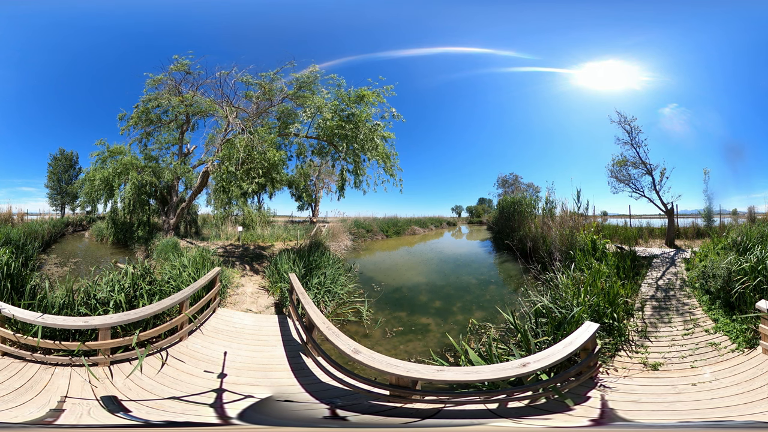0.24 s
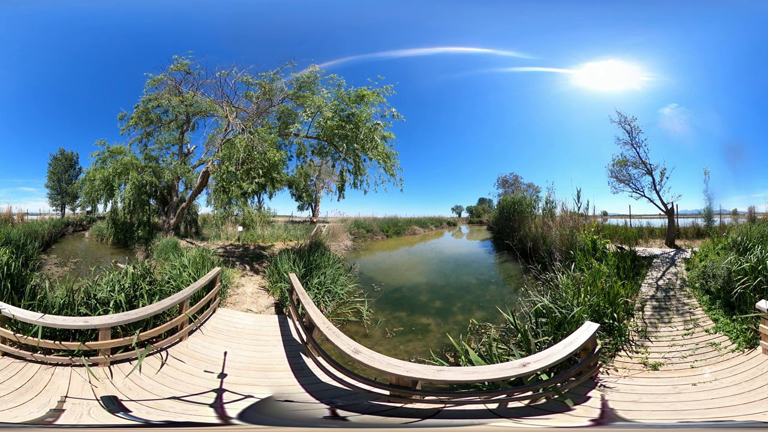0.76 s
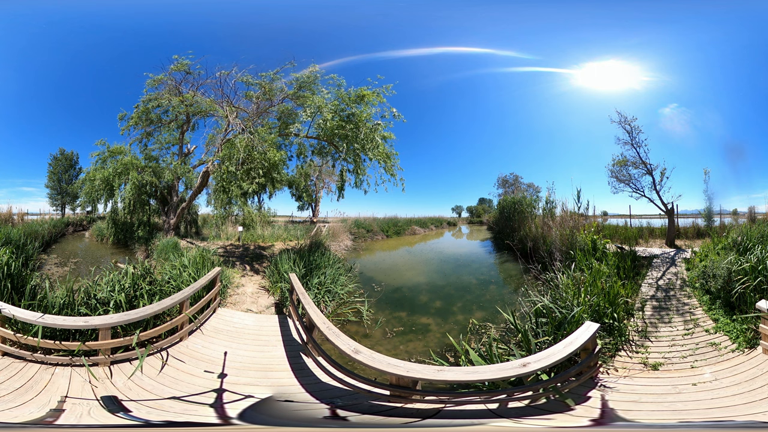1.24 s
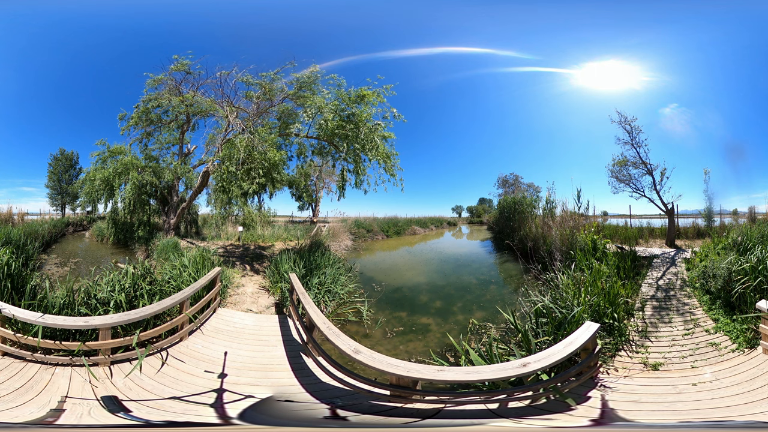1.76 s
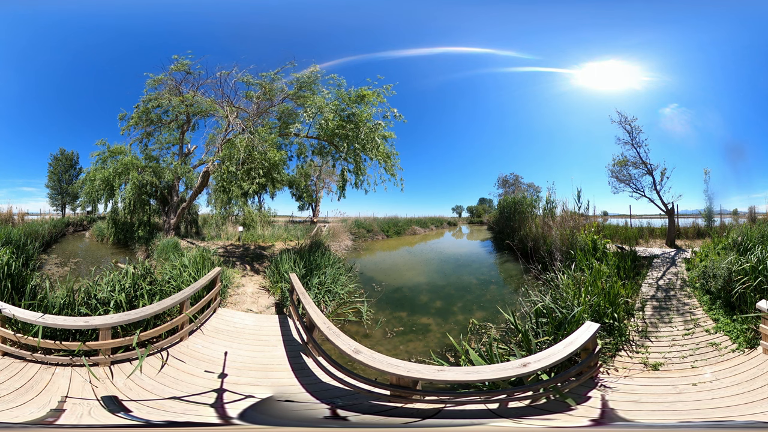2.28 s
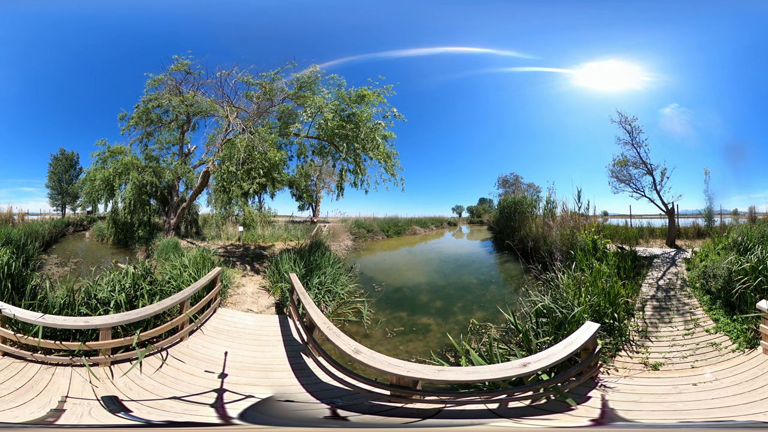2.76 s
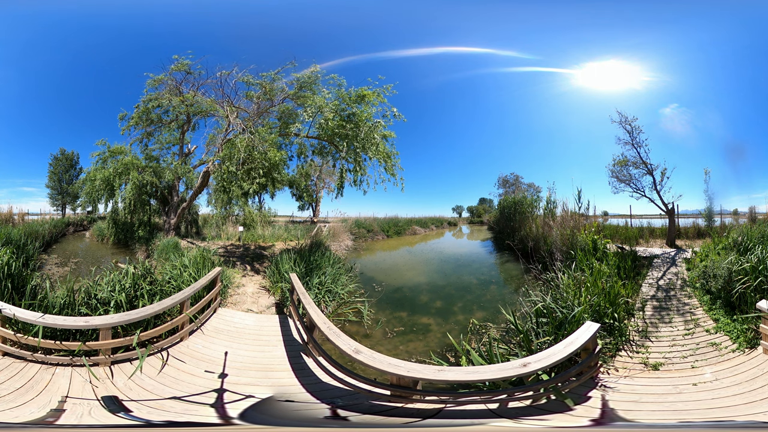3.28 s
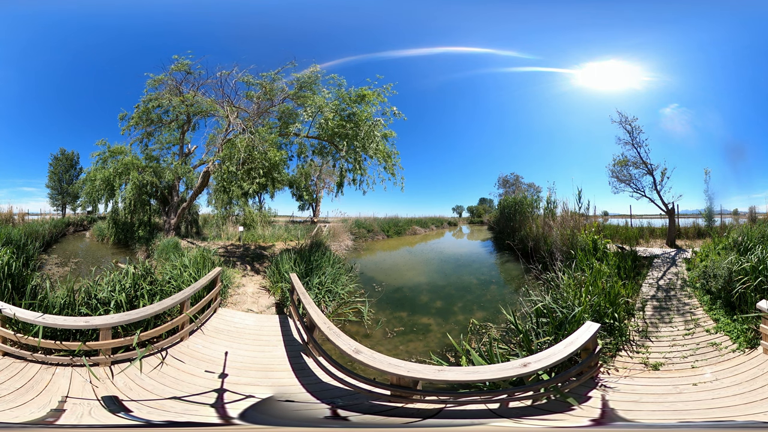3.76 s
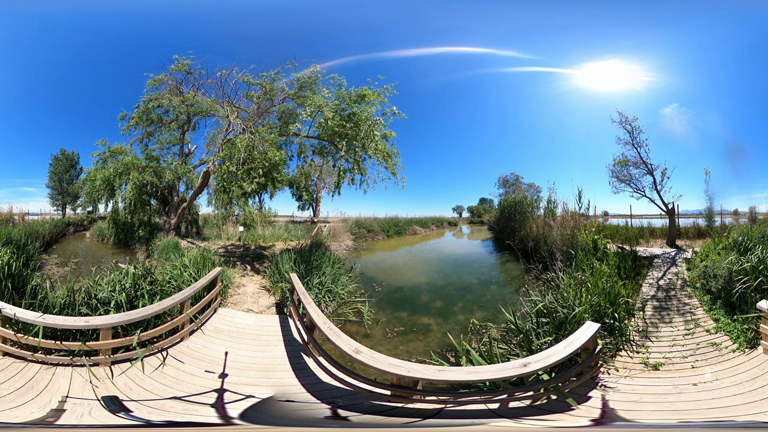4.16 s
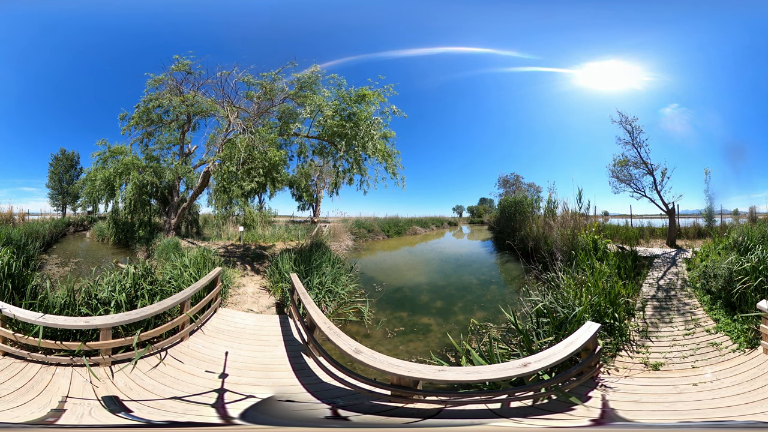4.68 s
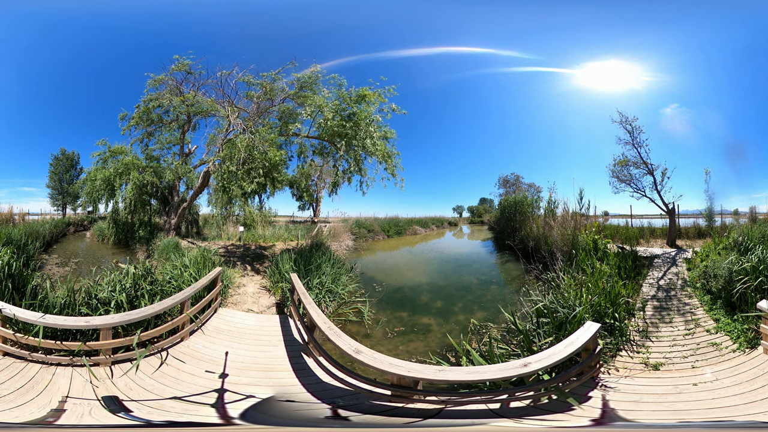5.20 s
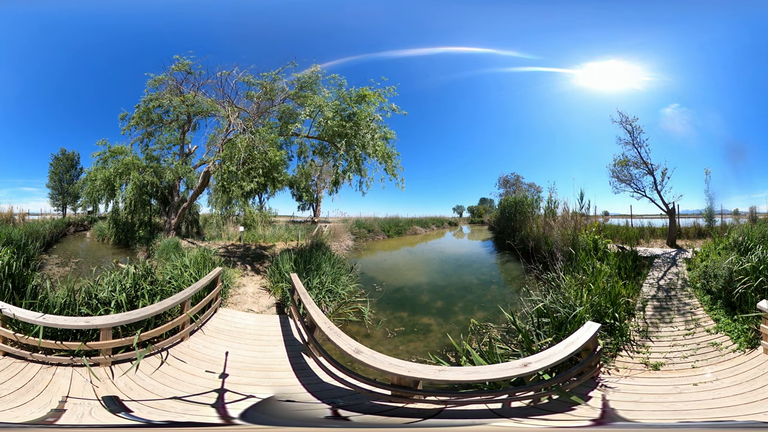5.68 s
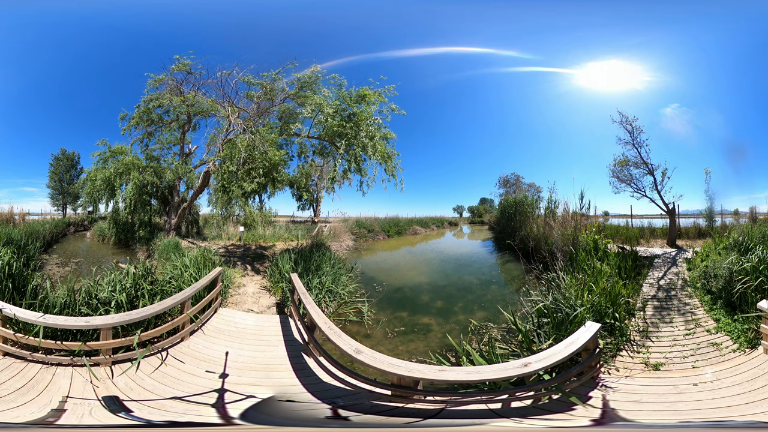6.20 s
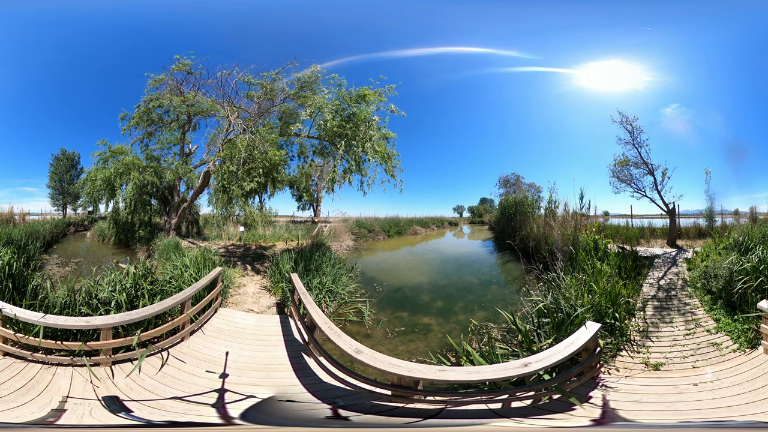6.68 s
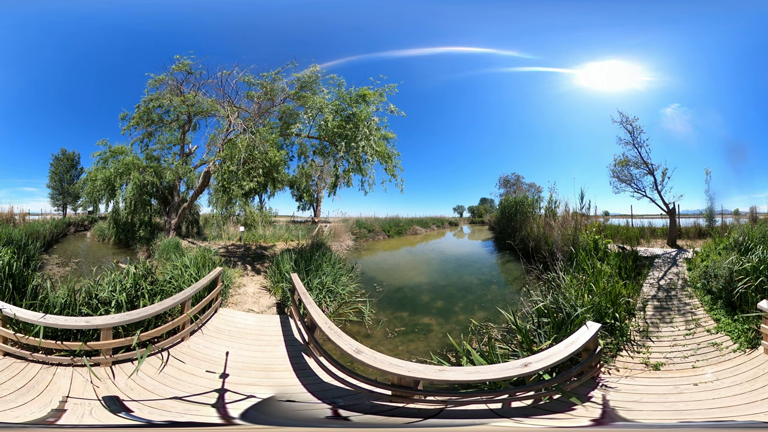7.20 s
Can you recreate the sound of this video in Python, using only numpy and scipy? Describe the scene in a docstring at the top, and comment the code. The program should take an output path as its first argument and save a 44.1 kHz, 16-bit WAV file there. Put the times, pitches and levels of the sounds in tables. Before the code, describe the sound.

Sharp high bird calls and a brief insect-like bird trill above faint open-air murmur, later joined by low wind buffeting the microphone.

```python
"""Small birds call around a reedy lagoon: two trade thin falling whistles, others chip and chirp, one gives a dry buzzing trill.
Reed stems scatter every call and a line of trees sends back a faint echo.
Distant air murmurs under them, and after three seconds gusts begin to rumble on the microphone."""
import sys
import numpy as np
from scipy import signal
from scipy.fft import rfft, irfft, next_fast_len
from scipy.io import wavfile
from scipy.ndimage import uniform_filter1d, map_coordinates

SR = 44100
rng = np.random.default_rng(int(sys.argv[2]) if len(sys.argv) > 2 else 0)


def inscribe(sig):
    """Save sig as 16-bit PCM at rate SR to the path in sys.argv[1].

    A 1-D sig is mono; a 2-D sig holds one channel per row.
    Samples are clipped to [-1, 1] before scaling.
    """
    pcm = np.round(np.clip(np.atleast_2d(sig).T, -1, 1) * 32767)
    wavfile.write(sys.argv[1], SR, pcm.astype(np.int16))


N = 328545

# Note shapes: (s from the start of the note, pitch Hz, level dB)
SHAPES = {
    "tsee": [(0, 8258, -12), (.002, 7357, -0.5), (.005, 4376, -19), (.0062, 7607, -6.5), (.009, 4868, -14), (.0102, 7570, -3), (.014, 7583, 0.5), (.036, 7492, -6.5), (.044, 7520, -7), (.056, 7244, 0), (.068, 6435, -2), (.079, 5603, -4), (.086, 5147, -35)],
    "ti-tsee": [(0, 6096, -22.5), (.004, 7667, -6.5), (.009, 6975, -1.5), (.014, 5207, -15.5), (.022, 4375, -28.5), (.026, 5710, -38.5), (.029, 7290, 3.5), (.043, 7825, -7), (.056, 7680, -4), (.068, 7210, 1), (.085, 5897, -1), (.092, 6010, -9)],
    "zip": [(0, 10700, -28), (.009, 9700, -25), (.013, 8300, -13.5), (.0145, 7200, 1.5), (.017, 5700, -7.5), (.021, 4400, -16), (.03, 3650, -23), (.042, 3300, -35)],
    "chip": [(0, 4535, -27.5), (.01, 5554, -8.5), (.022, 6350, -2), (.034, 6300, -6), (.043, 5825, -4.5)],
    "lisp": [(0, 5290, -12.5), (.012, 5600, 1), (.028, 6000, -1.5), (.042, 6087, -5.5)],
    "wit": [(0, 3450, -26.5), (.013, 3920, -21.5), (.018, 4880, -9.5), (.023, 5320, 0.5), (.029, 5550, -2.5), (.034, 5230, -9.5)],
    "tew": [(0, 5600, -11.5), (.025, 5300, -2.5), (.05, 4900, -7), (.065, 4400, -14)],
    "churr": [(0, 5660, -15.5), (.018, 4510, -0.5), (.034, 3707, -8), (.043, 3204, -3), (.048, 4160, -1), (.054, 3050, 10.5), (.062, 3880, -18.5), (.075, 3080, -11)],
    "chuck": [(0, 4500, -9), (.025, 3150, -6), (.033, 3548, 1), (.04, 2780, 1.5), (.052, 2850, -11)],
    "warble": [(0, 4784, -14), (.015, 5400, -2.5), (.027, 4120, -4.5), (.036, 4900, -10), (.047, 3724, -0.5), (.054, 4353, 0.5), (.064, 3400, -4), (.076, 4100, -8), (.09, 3288, 1)],
    "whoop": [(0, 1293, -5.5), (.06, 1453, -0.5), (.13, 1675, -1), (.2, 1650, -3), (.25, 1545, -13.5)],
}
# Calls: (s, shape, level dB, length factor, reed scatter dB)
CALLS = [
    (.351, "tew", -53, .33, -6.5),
    (.357, "zip", -33, 1.002, -6),
    (.487, "tsee", -38.5, 0.99, -5.5),
    (.745, "tsee", -70.5, 0.93, 3.5),
    (.83, "whoop", -74.5, .91, 7.5),
    (.968, "warble", -63.5, .93, -5),
    (1.339, "tsee", -41.8, 1.008, -4),
    (1.534, "tsee", -68.5, 0.985, 3),
    (1.874, "chip", -49.5, 0.75, -4),
    (1.933, "chip", -46.5, 1.03, -7),
    (2.260, "tsee", -46, 1.06, -0.5),
    (2.802, "chuck", -54.5, 1, -3),
    (3.032, "tsee", -49.5, 0.94, -4),
    (3.074, "tsee", -57, .96, -3),
    (3.892, "tsee", -49.5, 1.006, -2.5),
    (4.128, "warble", -71.5, 1.186, -0.5),
    (4.4, "chip", -54.5, 1.25, -2),
    (4.474, "lisp", -56, 0.87, -8),
    (4.611, "ti-tsee", -63, 0.97, -18.5),
    (4.727, "tsee", -52, 1, -0.5),
    (5.372, "warble", -68, 1.03, -2),
    (5.388, "ti-tsee", -57.5, 1.02, -7.5),
    (5.541, "tsee", -51.5, 0.956, -2),
    (5.895, "chuck", -73.5, 0.91, -1),
    (6.204, "ti-tsee", -54, 0.963, -6.5),
    (6.342, "tsee", -51.5, 0.88, -2.5),
    (6.675, "churr", -57.5, 0.988, 0.5),
    (6.974, "ti-tsee", -50.5, 1.002, -9.5),
    (7.051, "warble", -74.5, 1.39, -2),
    (7.168, "tsee", -68, 1.22, 7),
    (7.376, "wit", -45.5, 0.902, -10),
]
TRILL_NOTE = [(0, 5457, -36.5), (.0015, 4736, 7), (.0035, 4076, 0), (.006, 3697, 0.5), (.0078, 3430, 4.5), (.0095, 3281, -20)]  # (s, Hz, dB)
TRILL_THROAT = [(2800, -38), (3300, -14), (3430, -2), (4620, -0.5), (4760, -8.5), (5100, -5), (5600, -27.5)]  # (Hz, dB)
BUFFET = [(8, -12.5), (24, 3.5), (40, -3), (58, -7), (80, -21), (130, -40), (400, -120)]  # (Hz, dB per Hz)
GUST = [(30, -33), (60, 1), (82, 0), (115, -5.5), (160, -11), (220, -24), (350, -58), (900, -120)]  # (Hz, dB per Hz)
MURMUR = [(70, -16), (130, -4.5), (190, 4), (260, -3), (420, -7.5), (550, -8.5), (720, -12.5), (930, -16.5), (1030, -11), (1500, -13), (2200, -17.5), (3500, -22.5), (8000, -44.5), (14000, -51)]  # (Hz, dB per Hz)
CHORUS = [(4000, -12), (5200, -4), (5650, -3), (5850, 2), (6150, -5), (7600, -3.5), (8100, -11.5), (9000, -17), (12000, -32), (14000, -48.5)]  # far birds and reeds: (Hz, dB per Hz)
TOP_HZ = 13300  # fixed
RUSTLES = [(0.884, -66, 0.02), (2.791, -64, 0.0134), (3.938, -68, 0.118), (6.366, -64, 0.0049), (6.795, -72, .02)]  # reeds brushing: (s, level dB, half length s)
LEAVES = [(2000, -3.5), (4000, -10), (6300, 4), (7800, -5.5), (9000, -13.5), (12500, -23), (14000, -44)]  # (Hz, dB per Hz)
TRILL_RASP = [(3300, -33.5), (4700, 1.5), (5300, -8), (6000, -10), (8000, -23.5), (11000, -38.5), (13000, -51)]  # (Hz, dB per Hz)
FLUTTER = [(60, -40), (115, 2), (160, 0), (200, -15), (250, -30), (310, -42.5), (500, -60.5), (1200, -120)]  # (Hz, dB per Hz)
# The breeze freshens after three seconds: (s, level of its slow push on the microphone dB)
BREEZE = [(0, -58.5), (1.4, -55.5), (2.8, -53), (3.3, -44), (6.8, -46), (7.45, -49.5)]
# Gusts that hit the microphone: (s at the peak, slow push dB, rumble dB, length s)
GUSTS = [
    (2.935, -41, -63, 0.037),
    (3.153, -37, -58, 0.054),
    (3.311, -31, -50.5, 0.0967),
    (3.71, -41.5, -49.5, 0.043),
    (3.88, -39.5, -58, 0.026),
    (3.982, -34.5, -55.5, 0.022),
    (4.119, -47, -63.5, 0.04),
    (4.359, -37.5, -37, 0.046),
    (4.462, -24.5, -38, 0.0465),
    (4.531, -30.5, -36.5, 0.0846),
    (4.69, -32.5, -48.5, 0.0423),
    (4.972, -32.5, -74.5, 0.116),
    (5.314, -35.5, -71, 0.134),
    (5.439, -31.5, -49.5, 0.0227),
    (5.627, -34, -51.5, 0.073),
    (5.722, -36, -41, 0.0355),
    (5.823, -34, -53.5, 0.093),
    (6.085, -33, -43, 0.085),
    (6.329, -45.5, -51.5, 0.042),
    (6.654, -40.5, -47.5, .075),
    (6.87, -38.5, -60, 0.42),
    (7.02, -36, -53.5, 0.0556),
]
GUST_RISE, GUST_FALL = 0.613, 0.662  # shares of a gust's length
LIGHT_RUMBLE_DB, RUMBLE_GROWS = -71.5, 0.685  # rumble of the lightest breeze; dB more per dB of breeze
MURMUR_LEVEL = [(0, -64.5), (1.1, -63.5), (2.7, -64.5), (3.6, -66), (7.45, -66)]  # (s, level dB)
HAZE_DB, HAZE_DB_PER_S = -74.5, 0.3851  # the high haze slowly grows
TRILL_START_S, TRILL_PEAK_S, TRILL_END_S, TRILL_DB = 2.2, 2.771, 3.374, -52  # the trill swells, peaks and fades
TRILL_SWELL, TRILL_FADE = 1.002, 1.49  # steepness of the rise and of the fall
TRILL_FAST_HZ, TRILL_SLOW_HZ = 226.7, 167.14  # notes a second, early and late
TRILL_SLOWS_AT_S, TRILL_SLOWS_OVER_S = 2.65, .17
# Each kind of note: (pitch flutter share, t60 of the reeds around its perch s)
VOICES = {"tsee": (.0045, 0.255), "ti-tsee": (.0045, 0.19), "zip": (.003, 0.205), "chip": (.018, .23), "lisp": (0.025, .2),
          "wit": (.004, 0.12), "tew": (.01, .2), "churr": (0.0843, 0.152), "chuck": (0.0347, .16), "warble": (.03, .16), "whoop": (0.039, .23)}


def amp(db):
    """Decibels to gain."""
    return 10 ** (np.asarray(db) / 20)


def unit(x):
    """x at rms 1."""
    return x / np.sqrt(np.mean(x ** 2) + 1e-20)


def curves(rows, size=N):
    """One value per sample for each column after the time."""
    s, *cols = np.transpose(rows)
    return [np.interp(np.arange(size) / SR, s, c) for c in cols]


def wobble(rate, size=N):
    """A smooth random curve, rate knots a second."""
    return map_coordinates(rng.standard_normal(int(size * rate / SR) + 4), [np.arange(size) * rate / SR])


def filtered(x, response):
    """x times a response of frequency."""
    m = next_fast_len(N + SR // 2)
    return irfft(rfft(x, m) * response(np.fft.rfftfreq(m, 1 / SR)), m)[:N]


def coloured(x, points):
    """x through a spectrum of (Hz, dB) points, at rms 1."""
    f, db = np.transpose(points)
    return unit(filtered(x, lambda hz: amp(np.interp(np.log(hz + 1), np.log(f), db))))


def noise(points):
    """Noise of rms 1 with the given spectrum."""
    return coloured(rng.standard_normal(N), points)


def add(track, s, sound):
    """Mix a sound into the track at time s."""
    part = track[max(round(s * SR), 0):][:len(sound)]
    part += sound[:len(part)]


def whistle(shape, length=1, flutter=0, shimmer_db=2.5):
    """One note of the syrinx: a gliding sine, slightly unsteady in pitch and strength."""
    rows = np.array(shape) * [length, 1, 1]
    size = int(rows[-1, 0] * SR)
    hz, db = curves(rows, size=size)
    hz = hz * (1 + flutter * wobble(450, size=SR // 2)[:size])
    db = db + shimmer_db * wobble(127.9, size=SR // 2)[:size]
    return amp(db) * signal.windows.tukey(size, .06) * np.sin(2 * np.pi * np.cumsum(hz) / SR)


def reeds(x, scatter_db, near_t60=0.23, far_longer=3.92, far_db=-17):
    """The direct sound, a quick scatter from nearby stems and a long faint one from across the water."""
    t = np.arange(int(.6 * SR)) / SR  # fixed
    fade = (amp(-60 * t / near_t60) + amp(far_db - 60 * t / (far_longer * near_t60))) * (1 - np.exp(-t / 0.0016))
    tail = fade * rng.standard_normal(len(t))
    paths = amp(scatter_db) * tail / np.linalg.norm(tail)
    paths[0] = 1
    return signal.fftconvolve(x, paths)


def callers(echo_s=.125, echo_db=-25):
    """Each call comes from its own perch; the trees return it faintly."""
    track = np.zeros(N)
    for s, shape, db, length, scatter_db in CALLS:
        flutter, t60 = VOICES[shape]
        note = whistle(SHAPES[shape], length, flutter)
        call = amp(db) * reeds(note, scatter_db, near_t60=t60)
        add(track, s, call)
        add(track, s + echo_s, amp(echo_db) * call)
    return track


def trill(size_db=0.5, jitter_s=.00006, scatter_db=-4, rasp_db=-15, brighten=0.3):
    """A buzz of tiny falling notes that swells, slows down and fades; effort brightens it and adds a rasp."""
    t = np.arange(N) / SR
    rate = np.interp(np.tanh((t - TRILL_SLOWS_AT_S) / TRILL_SLOWS_OVER_S), [-1, 1], [TRILL_FAST_HZ, TRILL_SLOW_HZ])
    effort = arch(t, TRILL_START_S, TRILL_PEAK_S, TRILL_END_S, TRILL_SWELL, TRILL_FADE)
    times = np.flatnonzero(np.diff(np.floor(np.cumsum(rate) / SR))) / SR
    times = times[(times > TRILL_START_S) & (times < TRILL_END_S)]
    note, track = whistle(TRILL_NOTE, shimmer_db=0.0), np.zeros(N)
    for s, (strength, late) in zip(times, rng.standard_normal((len(times), 2))):
        opening = effort[int(s * SR)] ** (brighten * np.linspace(1, 0, len(note)))  # weak notes lose their high start
        add(track, s + jitter_s * late, amp(size_db * strength) * opening * note)
    sounding = (times[-1] - times[0]) * SR / N
    buzz = coloured(reeds(track, scatter_db)[:N], TRILL_THROAT) * np.sqrt(sounding)
    rasp = amp(rasp_db) * effort * noise(TRILL_RASP)
    return amp(TRILL_DB) * effort * (buzz + rasp)


def eddies(points, hold_s=0.099):
    """Low turbulence whose strength stays even from one eddy to the next."""
    x = noise(points)
    power = np.abs(uniform_filter1d(x ** 2, max(int(hold_s * SR), 1)))
    return unit(x / np.sqrt(power + 0.034))


def wind(push_wander_db=2.5, rumble_wander_db=2.0, flutter_db=-7.0, growth=0.4):
    """A restless breeze and its gusts push on the microphone; the stronger a gust, the more small, fast eddies it sheds."""
    breeze_db, = curves(BREEZE)
    _, pushes_db, rumbles_db, _ = np.transpose(GUSTS)
    light_db = LIGHT_RUMBLE_DB + RUMBLE_GROWS * (breeze_db - breeze_db.min())
    push = np.hypot(amp(breeze_db + push_wander_db * wobble(18)), gusting(pushes_db))
    force = np.hypot(amp(light_db + rumble_wander_db * wobble(12)), gusting(rumbles_db))
    shed = amp(flutter_db) * (force / force.max()) ** growth
    return push * eddies(BUFFET) + force * (eddies(GUST, hold_s=0.075) + shed * eddies(FLUTTER, hold_s=.05))


def distance(swell_db=.8):
    """The open landscape murmurs, with a shifting high haze of far birds and reeds."""
    murmur_db, = curves(MURMUR_LEVEL)
    haze_db = HAZE_DB + HAZE_DB_PER_S * np.arange(N) / SR + swell_db * wobble(5.2)
    return amp(murmur_db) * patchy(noise(MURMUR), depth_db=0.8525) + amp(haze_db) * patchy(noise(CHORUS), depth_db=1.3)


def rustles(grain_db=2.5):
    """Dry reed leaves brush each other in short, grainy swishes."""
    t = np.arange(N) / SR
    touch = sum(amp(db) * np.exp(-((t - s) / half) ** 2) for s, db, half in RUSTLES)
    return touch * unit(amp(grain_db * wobble(300)) * noise(LEAVES))


def patchy(x, depth_db):
    """x with patches of pitch and time that come and go at random."""
    z = signal.stft(x, nperseg=512)[2]
    field = rng.standard_normal(z.shape)
    field = uniform_filter1d(uniform_filter1d(field, size=7, axis=0), size=16, axis=1)
    return unit(signal.istft(z * amp(depth_db * unit(field)), nperseg=512)[1][:N])


def arch(t, start_s, peak_s, end_s, swell, fade):
    """An envelope that swells from nothing to 1 and fades again."""
    phase = np.interp(t, [start_s, peak_s, end_s], [0, 1, 2])
    return np.abs(np.sin(np.pi / 2 * phase)) ** np.where(phase < 1, swell, fade)


def gusting(levels_db):
    """The joint strength of all gusts: each swells and dies away at about the same pace."""
    t = np.arange(N) / SR
    power = np.zeros(N)
    for (s, _, _, length), db in zip(GUSTS, levels_db):
        width = length * np.where(t < s, GUST_RISE, GUST_FALL)
        power += amp(db) ** 2 / (1 + ((t - s) / width) ** 2) ** 3  # fixed
    return np.sqrt(power)


def scene():
    """Landscape, wind, birds and reeds at one microphone."""
    return (distance() + wind() + callers() + trill() + rustles())[None]


def record(dry):
    """The camera keeps nothing above its band limit."""
    return filtered(dry[0], lambda hz: hz < TOP_HZ)[None]


dry = scene()
out = record(dry)
inscribe(out)
```